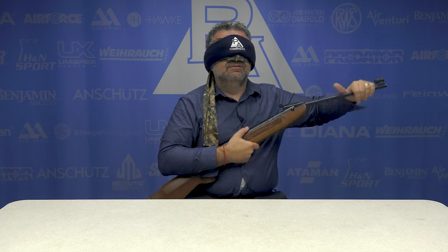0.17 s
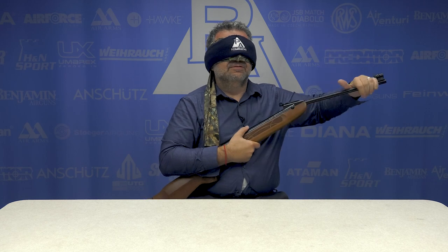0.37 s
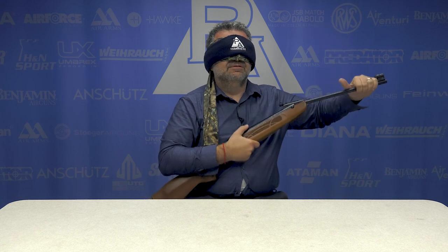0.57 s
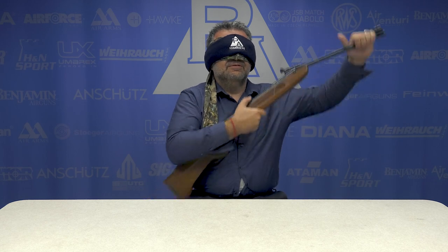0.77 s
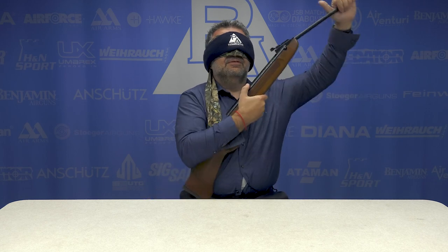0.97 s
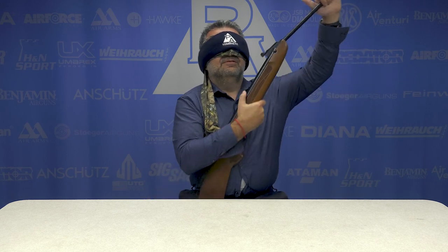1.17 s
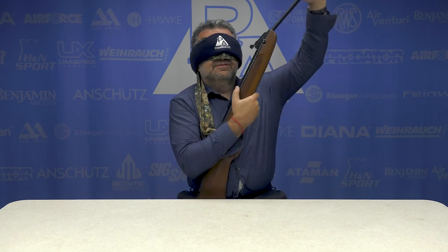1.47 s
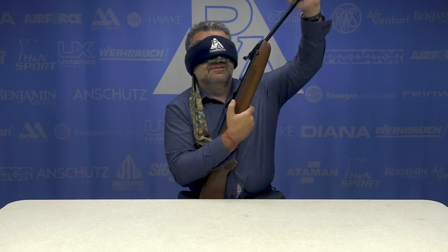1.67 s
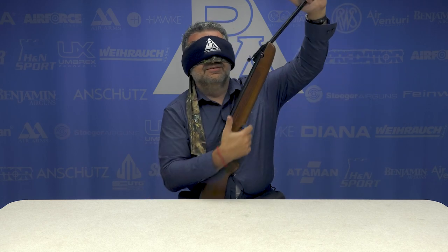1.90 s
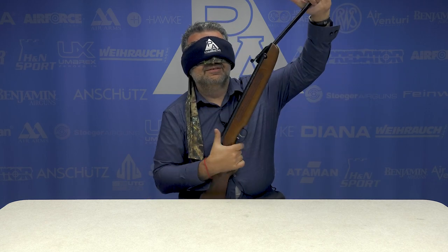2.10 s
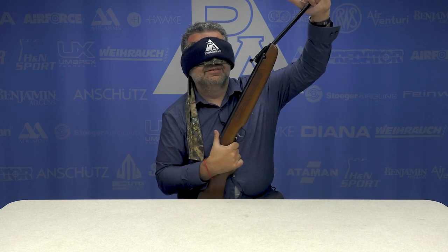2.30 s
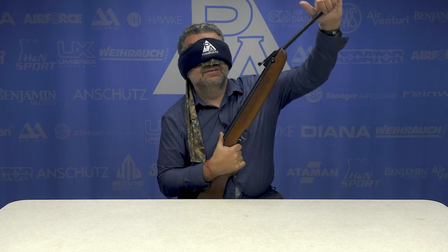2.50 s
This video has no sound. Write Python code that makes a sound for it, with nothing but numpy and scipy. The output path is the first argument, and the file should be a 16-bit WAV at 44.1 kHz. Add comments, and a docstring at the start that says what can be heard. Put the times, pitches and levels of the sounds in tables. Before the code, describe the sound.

An air rifle's barrel latch rattles and clacks sharply up close, then cloth rubs with soft thumps

```python
"""The barrel latch of a spring air rifle rattles and clacks close by, with a short dull tail of the dry room.
Cloth rubs over the one microphone, worn on the shirt, throughout and louder after the first clacks, with soft
thumps, short scrapes and tiny ticks; a last faint clack comes near the end. Blows ring decaying sines and crack
in filtered noise; thumps are sagging sines with a noise edge; cloth is noise in octave ranges under drawn levels,
scrapes are grainy narrow noise, ticks tiny pulses. A steady coloured noise is the air of the quiet room."""
import sys
import numpy as np
from scipy import signal
from scipy.fft import rfft, irfft
from scipy.io import wavfile
from scipy.ndimage import uniform_filter1d

SR = 44100
rng = np.random.default_rng(int(sys.argv[2]) if len(sys.argv) > 2 else 0)


def to_wav(sig):
    """Store sig (one row per channel, or 1-D mono) as 16-bit WAV at the path in sys.argv[1].

    Samples outside -1..1 are clipped; the rate is SR.
    """
    pcm = np.clip(np.atleast_2d(sig), -1, 1) * 32767
    pcm = np.round(pcm).astype(np.int16)
    wavfile.write(sys.argv[1], SR, pcm.T)  # frames by channels


N = 116865  # samples
TOP_HZ = 15800  # top of the recorder and of the room's tail


def undb(db):
    """Gain of a level in dB."""
    return 10 ** (np.asarray(db) / 20)


def unit(x):
    """Scale to an rms of 1."""
    return x / np.sqrt(np.mean(x ** 2))


def add(out, at_s, x):
    """Mix x into out from the time at_s, cut at the end of the scene."""
    i = int(at_s * SR)
    out[i:i + len(x)] += x[:N - i]


def band(x, lo_hz, hi_hz):
    """Band-pass with gentle slopes."""
    sos = signal.butter(2, [lo_hz, min(hi_hz, .45 * SR)], "bp", fs=SR, output="sos")
    return signal.sosfilt(sos, x)


def coloured(colour):
    """Spectrum of white noise shaped by (f/Hz, level/dB) points, and its frequencies in Hz."""
    hz = np.arange(N // 2 + 1) * SR / N + 0.00064  # the offset keeps the logarithm finite
    points = np.array(colour)
    level_db = np.interp(np.log(hz), np.log(points[:, 0]), points[:, 1])
    return rfft(rng.standard_normal(N)) * undb(level_db), hz


def walk(rate):
    """Random levels, rate of them per second, smoothed into slopes and scaled to an rms of 1."""
    hold = int(SR / rate)
    steps = np.repeat(rng.standard_normal(N // hold + 1), hold)
    smooth = uniform_filter1d(uniform_filter1d(steps, hold), hold)
    return unit(smooth[:N])


def room_air():
    """Steady air of the quiet room: stationary noise, strongest in the bass."""
    # colour of the air before scaling: f/Hz, level/dB per Hz
    air_colour = [(18, -40.5), (30, -5), (70, 3), (273, -7), (526, -10), (569, -23), (988, -24),
                  (11100, -41.5), (16000, -46.5)]
    spectrum, _ = coloured(air_colour)
    return unit(irfft(spectrum, N)) * undb(-71.5)  # rms in dB


def cloth(level_db, treble_db, middle_db, rumble_db):
    """Friction noise of cloth at the microphone: octave ranges follow drawn levels, each with its own flicker."""
    # colour of the rubbing before scaling: f/Hz, level/dB per Hz
    cloth_colour = [(18, -38), (30, 2), (86, -2.5), (161, -4), (280, -14), (632, -15.5), (1500, -17),
                    (2500, -21), (5000, -24.5), (8000, -27), (12000, -26), (14500, -29), (16000, -31)]
    flicker_db, flicker_per_s = 1, 33  # rms of the flicker, new levels per second
    rumble_hz, middle_hz, treble_hz = 350, 2500, 7000  # edges that sort the octave centres
    treble_share = 0.57  # of the treble change that reaches the octave below the top one
    noise, hz = coloured(cloth_colour)
    # level_db refers to the rms between 3 and 7 kHz, before the range changes and flicker
    reference = np.std(irfft(noise * (hz > 3000) * (hz < 7000), N))
    out = np.zeros(N)
    for centre in 31.25 * 2 ** np.arange(10):
        # neighbouring octaves crossfade
        share = np.cos(np.pi / 2 * np.clip(np.log2(hz / centre), -1, 1)) ** 2
        if centre < rumble_hz:
            range_db = rumble_db
        elif centre < middle_hz:
            range_db = middle_db
        elif centre <= treble_hz:
            range_db = 0
        elif centre <= 2 * treble_hz:
            range_db = treble_db * treble_share
        else:
            range_db = treble_db
        flicker = flicker_db * walk(flicker_per_s)
        out += irfft(noise * share, N) * undb(level_db + range_db + flicker)
    return out / reference


def ticks(level_db):
    """Lone ticks and a random crackle of fibres that follows the rubbing: very short damped pulses."""
    # lone ticks: t/s, peak level/dB
    lone_ticks = [(.280, -48), (.4035, -65.5), (.415, -55), (.528, -52), (.558, -78)]
    decay_s, pulse_hz = 0.000086, 3000
    crackle_per_s, crackle_db = 60, 10  # mean rate, largest grain against the rubbing level
    chance, size = rng.random((2, N))
    pulses = (chance < crackle_per_s / SR) * (2 * size - 1) * undb(level_db + crackle_db)
    for at, db in lone_ticks:
        add(pulses, at, undb([db]))
    t = np.arange(128) / SR
    tick = np.exp(-t / decay_s) * np.cos(2 * np.pi * pulse_hz * t)
    return np.convolve(pulses, tick)[:N]


def scrapes():
    """Short friction bursts: cubed noise gives the grain, one band-pass each the resonance."""
    # scrapes: middle t/s, length/s between the 1/e points, level/dB, centre f/Hz, width/Hz
    scrape_list = [(0.775, 0.038, -55, 1610, 700), (0.814, 0.052, -49.5, 1260, 920),
                   (0.996, 0.0049, -48, 1270, 1000), (1.027, 0.038, -53.5, 1550, 395),
                   (1.845, .005, -71, 10500, 1500), (1.854, 0.0089, -46, 11400, 2500),
                   (2.051, 0.022, -52, 840, 497), (2.297, 0.014, -57.5, 450, 400)]
    out, t = np.zeros(N), (np.arange(4096) - 2048) / SR
    for at, length, db, hz, width in scrape_list:
        noise = rng.standard_normal(4096)
        grain = unit(band(noise ** 3, max(hz - width / 2, 50), hz + width / 2))
        swell = np.exp(-(2 * t / length) ** 2)
        add(out, at + t[0], undb(db) * grain * swell)
    return out


def thumps():
    """Soft thumps through the body: damped sines whose pitch sags, with a short brighter noise edge."""
    # thumps: t/s, peak level/dB, starting f/Hz, t60/s, edge level/dB against the peak
    thump_list = [(.046, -27, 173, 0.045, -27), (0.069, -28.5, 201, 0.064, -30),
                  (0.145, -40, 227, 0.13, -30), (0.154, -38, 147, 0.18, -30),
                  (0.182, -37.5, 88.6, 0.13, -32), (.511, -57.5, 150, .06, -14),
                  (0.7016, -26, 148, 0.058, -11), (0.756, -42, 119, 0.032, -16),
                  (.792, -39.5, 206, 0.13, -29), (.803, -35, 197, 0.12, -24), (0.837, -44, 151, .08, -12),
                  (0.926, -34, 130, .06, -10.5), (0.952, -42, 155, 0.059, -13),
                  (0.961, -30, 132, 0.014, -12), (0.968, -31.5, 90, 0.048, -22),
                  (0.998, -47, 100, 0.069, -20), (1.066, -38, 105, 0.098, -12),
                  (1.102, -33, 134, 0.036, -18), (1.118, -38, 103, 0.056, -15),
                  (1.153, -37, 297, 0.0067, -19), (1.263, -37, 205, 0.03, -5.5),
                  (1.273, -45, 282, 0.23, -23), (1.406, -48, 118, 0.035, -27),
                  (1.451, -40.5, 164, 0.046, -9), (1.617, -42.5, 117, .06, -20),
                  (1.75, -41, 107, 0.035, -26), (1.796, -49.5, 121, 0.035, -22),
                  (1.817, -47, 79.5, 0.09, -23), (1.941, -37, 146, 0.039, -12),
                  (2.054, -42.5, 121, 0.065, -20), (2.075, -39, 213, 0.022, -16),
                  (2.180, -29.5, 123, .1, -24), (2.258, -47.5, 120, 0.026, -10),
                  (2.3319, -36, 241, 0.021, -12), (2.336, -33.5, 72.5, .09, -30),
                  (2.575, -37, 140, 0.029, -29), (2.593, -39, 150, 0.02, -35),
                  (2.627, -35.5, 327, 0.034, -30), (2.6381, -37, 176, 0.043, -24),
                  (2.523, -48, 151, .05, -20), (0.21, -40, 110, 0.017, -30),
                  (0.077, -35, 256.7, .12, -34.5)]
    sag_share, sag_s = .6, 0.0071  # final pitch against the starting pitch, time constant
    rise_s, edge_s, edge_hz = 0.00069, .002, 680
    out, t = np.zeros(N), np.arange(8192) / SR
    for at, db, hz, t60, edge_db in thump_list:
        # integral of the sagging pitch, in turns
        turns = hz * (sag_share * t + (1 - sag_share) * sag_s * (1 - np.exp(-t / sag_s)))
        knock = np.sin(2 * np.pi * turns) * undb(-60 * t / t60) * (1 - np.exp(-t / rise_s))
        add(out, at, undb(db) * knock / knock.max())
        noise = unit(band(rng.standard_normal(1024), edge_hz / 3, edge_hz * 2))
        add(out, at, undb(db + edge_db) * noise * np.exp(-t[:1024] / edge_s))
    return out


def room(x):
    """Short dull tail of the room: convolution with decaying noise, its bright part weaker and quicker."""
    dull_db, dull_t60_s = -38, 0.16
    bright_db, bright_t60_s = -44, 0.14
    split_hz, fade_in_s = 2500, .008
    t = np.arange(SR // 2) / SR
    dull_noise, bright_noise = rng.standard_normal((2, SR // 2))
    tail = undb(dull_db - 60 * t / dull_t60_s) * band(dull_noise, 100, split_hz)
    tail += undb(bright_db - 60 * t / bright_t60_s) * band(bright_noise, split_hz, TOP_HZ)
    return signal.fftconvolve(x, tail * np.clip(t / fade_in_s, 0, 1))[:N]


def blows():
    """Blows on steel and stock: rattling contacts excite the rifle's damped modes, with a noisy crack on top."""
    # blows: t/s, rattle length/s, level/dB, favoured f/Hz, fall/dB per octave away from it,
    # share of the free ring time, crack level/dB against the blow
    blow_list = [(.0430, 0.0051, -34.5, 1500, -2, 0.75, 2), (0.0473, 0.0035, -27.5, 1500, 1.5, 0.4, -7.5),
                 (.0537, 0.0018, -26, 4500, 4, 0.55, -4), (0.064, 0.0025, -19, 6300, 11, .4, -1),
                 (0.0658, .004, -12.5, 1820, 0, 0.39, -6), (.0700, 0.0015, -27.5, 2050, 5, 1.1, -25),
                 (0.076, .004, -37.5, 13000, -0.5, 0.72, -1), (.0950, 0.0088, -41.5, 1300, 8.5, .4, -4),
                 (0.1427, 0.00019, -19, 1110, 7.5, 0.58, -11), (0.151, 0.00094, -22, 6350, 6, 0.49, -10),
                 (.1700, 0.0099, -41.5, 1374, 24, 0.28, -15), (2.6221, .001, -51.5, 1210, 23, 0.1, -18),
                 (2.6265, 0.00025, -29.5, 1360, 10, 0.49, -31)]
    # free modes of the rifle, before a blow colours and damps them: f/Hz, level/dB, t60/s
    modes = [(344, -5, .09), (666, -14.5, 0.01), (854, -6, 0.043), (995, 0, 0.054), (1478, -12, 0.053),
             (1678, -4.5, 0.032), (2078, 0.5, .035), (2385, -4, 0.027), (3040, -8, .015), (3700, -8, .015),
             (4190, -6, 0.021), (4750, -7, 0.017), (6320, -2, 0.011), (6900, -15, .02), (8500, -19.5, .012),
             (10900, -34.5, .012), (13660, -19.5, .01)]
    detune, scatter_db = .012, 2  # spread of the modes from blow to blow: share of the pitch, level
    first_contact = 6.3  # size of the first contact against the random ones that follow
    crack_s, crack_spread = 0.00093, 2.04  # decay, factor either way from the favoured frequency
    wide_db, wide_top_hz = -14, 13000  # wide part of the crack
    out, t = np.zeros(N), np.arange(8192) / SR
    short_t = t[:1024]
    for at, length, db, best_hz, fall_db, damp, crack_db in blow_list:
        contact_noise, crack_noise, scatter, shift = rng.standard_normal((4, 1024))
        ring = np.zeros(len(t))
        for k, (hz, mode_db, t60) in enumerate(modes):
            start_db = mode_db - fall_db * abs(np.log2(hz / best_hz)) + scatter_db * scatter[k]
            tone = np.sin(2 * np.pi * hz * (1 + detune * shift[k]) * t)
            ring += undb(start_db - 60 * t / (t60 * damp)) * tone
        # squaring with the sign kept makes a few contacts stand out
        contacts = contact_noise * np.abs(contact_noise) * np.exp(-(short_t / length) ** 4)
        rattle = np.convolve(ring, np.r_[first_contact, contacts])
        # the loudest 64 samples set the level, as for a sine of peak 1
        rattle /= np.sqrt(uniform_filter1d(rattle ** 2, size=64).max() * 2)
        add(out, at, undb(db) * rattle)

        crack = band(crack_noise, best_hz / crack_spread, best_hz * crack_spread)
        crack = crack + undb(wide_db) * band(crack_noise, 1500, wide_top_hz)
        # holds through the rattle, then dies away
        fade = np.exp(-np.maximum(short_t - length, 0) / crack_s)
        add(out, at, undb(db + crack_db) * unit(crack) * fade / 2)  # crack level is for an rms of 1/2
    return out


def scene():
    """Everything that reaches the one microphone on the shirt, the same in both channels."""
    # levels of the rubbing noise over time, with an abrupt rise near 0.49 s:
    # t/s, level/dB, then treble/dB, middle/dB and rumble/dB against the level
    rubbing = np.array([(0, -79.5, 2, -2, 1), (0.201, -84, 9, 7.5, 10), (.27, -72.5, 2, -2.5, 1),
                        (.33, -84.5, 4.5, 1.5, 0), (0.429, -87, -1, -0.5, 1), (.487, -85.5, 6.5, 1, -1.5),
                        (0.494, -73, 5.5, 1, 6), (.58, -77, 1.5, 1.5, 1.5), (.62, -67.5, 3.5, -0.5, 1),
                        (0.669, -60.5, 7.5, -4.5, -2), (.77, -59.5, 7.5, 0, -3), (.82, -58.5, 3, -5, -1.5),
                        (.855, -67, 8.5, 3.5, 12), (.88, -57.5, 2, -4.5, -7.5), (.92, -61.5, 2, 2.5, 9),
                        (.97, -58.5, 3.5, -2, 6.5), (1.03, -64.5, 6, 6, 4.5), (1.11, -64, 9.5, -1, 4.5),
                        (1.22, -59.5, 0, -4.5, -5), (1.26, -65.5, 3.5, -1.5, -11.5),
                        (1.3, -59.5, -1, -7, -5), (1.34, -69, -1, 0, -6), (1.42, -59.5, -3.5, -4.5, -3.5),
                        (1.53, -64.5, 1.5, 1.5, -7), (1.58, -70, 4, 2.5, 4), (1.73, -62.5, -0.5, -1.5, -3),
                        (1.82, -67, -2.5, -1.5, 7.5), (1.89, -60, 1, -0.5, -7), (1.94, -64.5, 5, 1.5, 10.5),
                        (1.98, -72.5, 9.5, 3, 9), (2.07, -65, 3.5, -0.5, 6.5), (2.13, -66.5, 12, 1, 4),
                        (2.175, -64, -0.5, -2, 3.5), (2.19, -72.5, 2.5, 4, 6), (2.24, -71, 1, 0.5, 4.5),
                        (2.33, -70, -2, -1, 2), (2.44, -74, 1, 0.5, 4), (2.58, -71, 2.5, 2, 5.5),
                        (2.65, -70.5, 9, 1.5, 15.5)])
    t = np.arange(N) / SR
    curves = [np.interp(t, rubbing[:, 0], rubbing[:, k]) for k in range(1, 5)]
    handling = cloth(*curves) + ticks(curves[0]) + scrapes() + thumps()
    hits = blows()
    mono = room_air() + handling + room(hits) + hits
    return np.array([mono, mono])


def record(dry):
    """The recorder cuts the top with a steep low-pass."""
    return signal.sosfilt(signal.ellip(10, .2, 60, TOP_HZ, fs=SR, output="sos"), dry)


dry = scene()
out = record(dry)
to_wav(out)
```